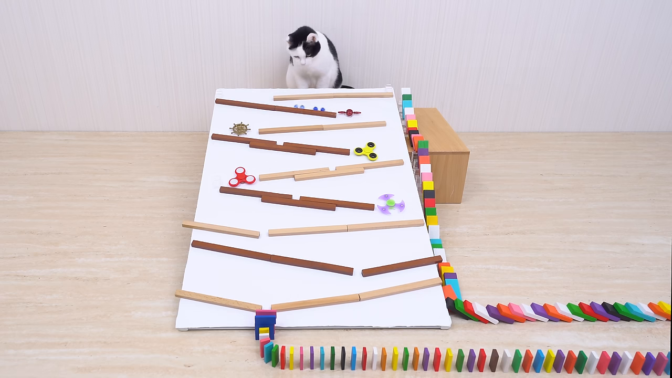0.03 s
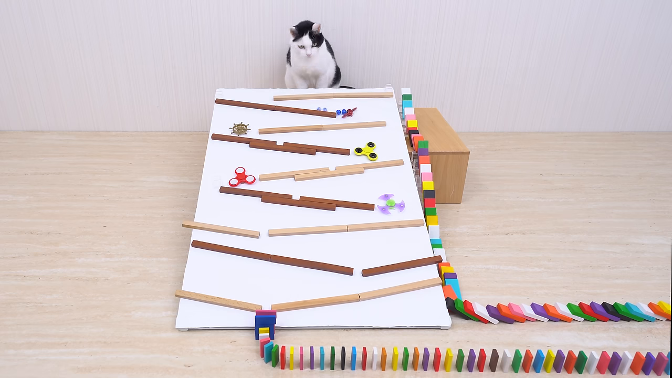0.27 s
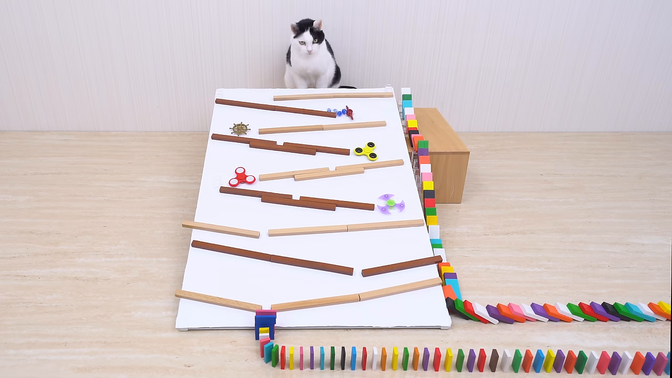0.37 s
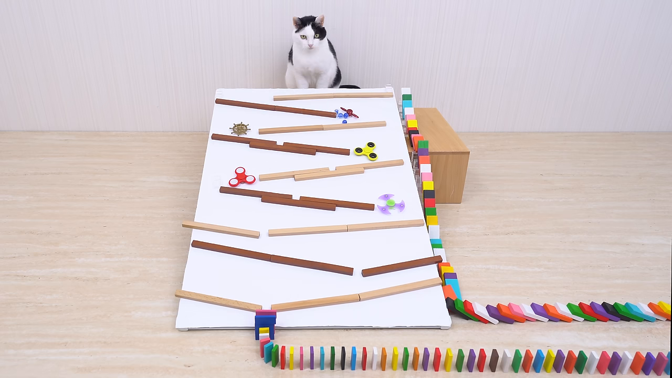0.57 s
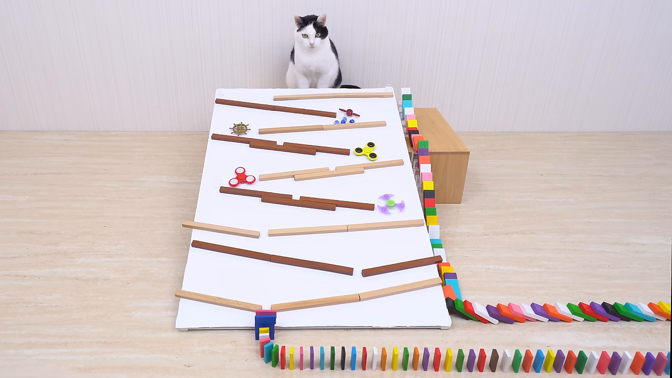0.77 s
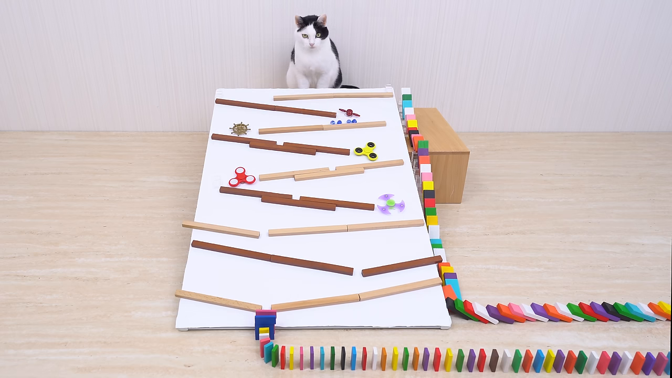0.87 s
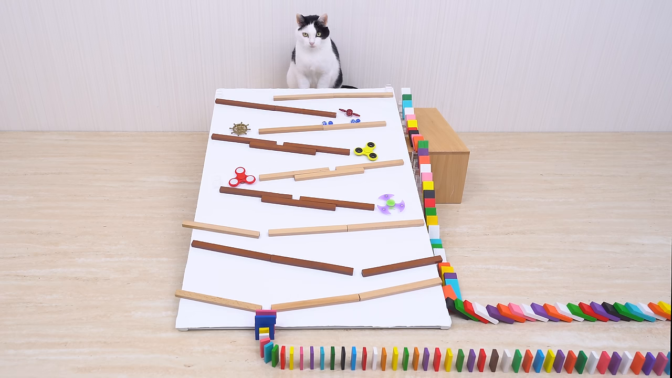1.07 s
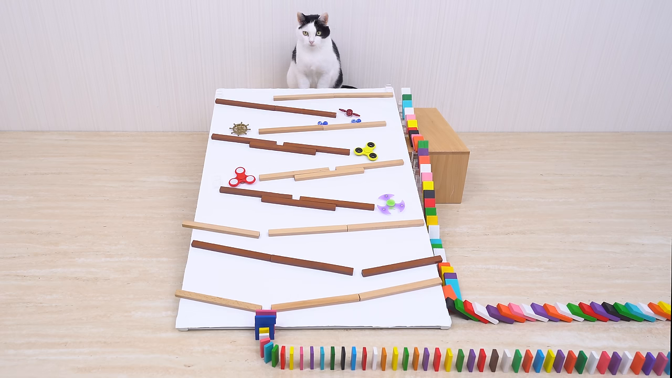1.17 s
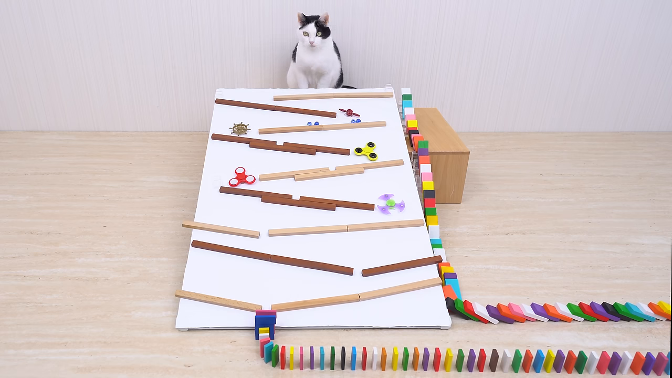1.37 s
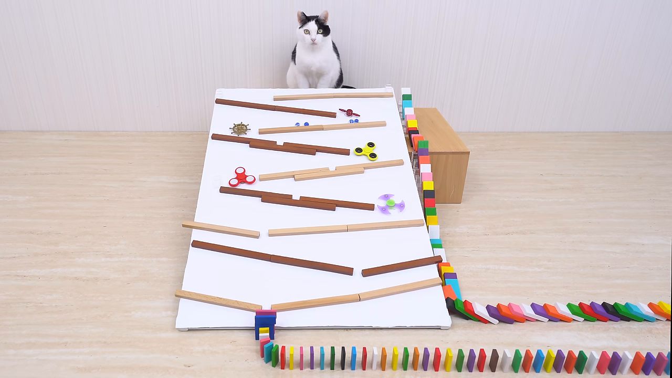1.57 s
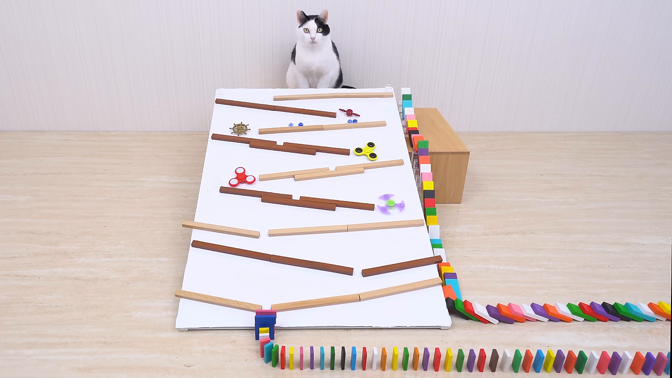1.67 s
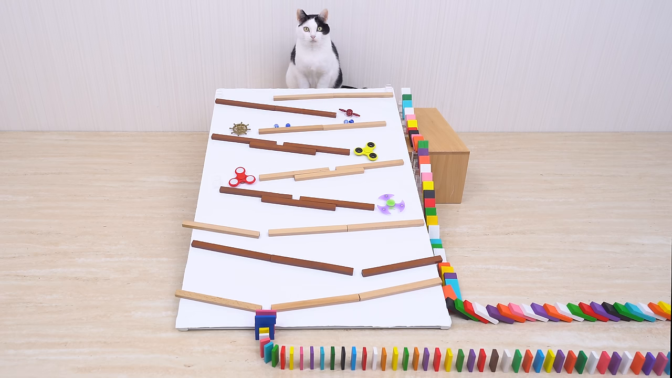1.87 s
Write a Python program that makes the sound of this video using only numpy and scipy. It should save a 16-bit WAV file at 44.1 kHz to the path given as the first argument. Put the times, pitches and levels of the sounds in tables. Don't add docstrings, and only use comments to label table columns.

```python
import sys
import numpy as np
from scipy import signal
from scipy.fft import rfft, irfft
from scipy.io import wavfile
from scipy.ndimage import uniform_filter1d

SR = 44100
rng = np.random.default_rng(int(sys.argv[2]) if len(sys.argv) > 2 else 0)


def boost(x):
    u = np.asarray(x, float) / 20
    return 10 ** u


def file_out(sig):
    cols = np.atleast_2d(sig).T
    lim = np.clip(cols, -1, 1)
    pcm = np.round(lim * 32767).astype(np.int16)
    wavfile.write(sys.argv[1], SR, pcm)


N = 83790


def read(points, hz):
    f, value = np.transpose(points)
    return np.interp(np.log(hz + 1), np.log(f + 1), value)


def evened(x):
    return x / np.sqrt(np.mean(x ** 2) + 1e-20)


def add(mix, start_s, sound):
    part = mix[max(round(start_s * SR), 0):][:len(sound)]
    part += sound[:len(part)]


def colour(x, points):
    hz = np.fft.rfftfreq(len(x), 1 / SR)
    return irfft(rfft(x) * boost(read(points, hz)), len(x))


def below(x, top_hz):
    hz = np.fft.rfftfreq(len(x), 1 / SR)
    return irfft(rfft(x) * np.clip((top_hz - hz) / 300, 0, 1), len(x))


def ring(modes, rise_s, detune=0.024, scatter_db=4):
    t = np.arange(SR // 4)[:, None] / SR
    hz, db, t60 = np.transpose(modes)
    level, pitch, sign = rng.standard_normal((3, len(hz)))
    decay = boost(db + scatter_db * level - 60 * t / t60)
    tones = decay * np.sin(2 * np.pi * hz * (1 + detune * pitch) * t) * np.sign(sign)
    x = tones.sum(1) * (1 - np.exp(-t[:, 0] / rise_s))
    return x / abs(x).max()


def bumps(per_s, modes, detune):
    spread_db = 4
    size = boost(spread_db * np.minimum(rng.exponential(1, N), 4))
    size = size * (rng.random(N) < per_s / SR) * rng.choice([-1, 1], N)
    spot = rng.integers(0, 4, N)
    out = np.zeros(N)
    for k in range(4):
        out += signal.oaconvolve(size * (spot == k), ring(modes, 0.000067, detune))[:N]
    return evened(out)


def click(points, t60, rough):
    size, spread_s = 2048, .0016
    t = np.arange(size) / SR
    log_gain = np.log(boost(read(points, abs(np.fft.fftfreq(size, 1 / SR)))))
    gain = np.exp(log_gain - 1j * signal.hilbert(log_gain).imag)[:1025]
    late_s = spread_s * np.interp(np.arange(1025), np.linspace(0, 1024, 16), rng.random(16) ** 2)
    shape = irfft(gain * np.exp(-2j * np.pi * np.cumsum(late_s) * SR / size))[:1024]
    chatter = rough * rng.standard_normal(size) * boost(-60 * t / t60)
    x = np.convolve((t == 0) + chatter, shape)[:1024]
    return x / abs(x).max()


def pushes(rows):
    t = np.arange(N) / SR
    return sum(boost(db) * np.sin(np.pi * np.clip((t - s) / length, 0, 1) ** 0.47) for s, length, db in rows)


def sliding(rows, points):
    snaps = rng.standard_normal(N) * (rng.random(N) < 4000 / SR)
    return pushes(rows) * evened(below(colour(snaps, points), 16000))


# pitch_hz, level_db (per Hz)
ROOM_TONE = [(12, -45), (20, 2), (146, -10.5), (574, -4), (678, -8.5), (1610, -22), (3530, -34.5),
             (9670, -36), (16000, -35)]


def room_tone():
    return boost(-71) * evened(below(colour(rng.standard_normal(N), ROOM_TONE), 12950))


# time_s, level_db
ROLL_LOAD = [(0, -55), (.22, -56.5), (.43, -56), (.5, -52), (0.581, -57), (.64, -52.5), (.68, -57.5),
             (.72, -65.5), (.77, -54.5), (.8, -59), (0.869, -54.5), (.915, -52), (.98, -51), (1.035, -62),
             (1.06, -72), (1.572, -73), (1.802, -70.5), (1.9, -65)]
# pitch_hz, level_db, t60_s
BOARD = [(283, -13.5, 0.015), (399.6, 3, 0.1), (426.5, -17, 0.96), (485, 7, 0.054), (508.3, -7.5, 0.14),
         (578, 3.5, 0.12), (759.6, 4, 0.055), (870, 2.5, 0.06), (980, -8, 0.089), (1228, -11, 0.092)]
# pitch_hz, level_db, t60_s
SLAT = [(1250, -11.5, 0.011), (1600, -2.5, 0.0024), (2144, -21, 0.031), (2850, 7.5, 0.0015),
        (4440, -13, 0.013)]


def rolling():
    load_db = np.interp(np.arange(N) / SR, *np.transpose(ROLL_LOAD))
    rumble = boost(load_db - 2) * bumps(1400, BOARD, 0.022)
    grit_db = -24.5 - 55.5 + 2.9 * (load_db + 59.0)
    grit = boost(grit_db) * below(bumps(9000, SLAT, 0.023), 4750)
    return rumble + grit


# start_s, length_s, level_db
HISSES = [
    (-.06, 0.095, -76),
    (.19, 0.077, -83),
    (1.25, .12, -82.5),
]
# pitch_hz, level_db
HISS = [(3000, -19.5), (5000, 0.5), (7500, -0.5), (9500, -6), (13000, -15.5)]


def faint_hisses():
    return sliding(HISSES, HISS)


KNOCK_T60_S, KNOCK_ROUGH = .005, .07
# start_s, body_db, click_db
LOW_KNOCKS = [
    (.069, -66.5, -75),
    (0.1184, -60, -57.5),
    (.13, -67.5, -58),
    (0.483, -39, -44),
    (1.1796, -50.5, -48.5),
    (1.3039, -47.5, -48.5),
]
# pitch_hz, level_db, t60_s
LOW_SLAT = [(418, -4.5, 0.099), (570, -1.5, 0.039), (890, -10, 0.036), (956, 1.5, 0.034),
            (1270, -7.5, 0.011), (1850, -13, 0.0066), (2500, -10.5, 0.0057), (3000, 0, 0.017),
            (3516, -15, 0.011), (4470, -3, .015)]
# pitch_hz, level_db
LOW_CLICK = [(300, -16.5), (900, -4.5), (2000, 6), (3400, -1.5), (4500, -5.5), (5000, -14.5), (6000, -13.5),
             (12000, -43)]


def low_knocks():
    out = np.zeros(N)
    for s, body_db, click_db in LOW_KNOCKS:
        add(out, s, boost(body_db) * ring(LOW_SLAT, .0003, detune=0.011, scatter_db=3.5))
        add(out, s, boost(click_db) * click(LOW_CLICK, KNOCK_T60_S, KNOCK_ROUGH))
    return out


# pitch_hz, level_db
TICK = [(880, -65), (1500, -38), (4130, -15), (5330, 2.5), (7910, 10.5), (15600, 5), (16900, -48.5)]


def glass_tick():
    return click(TICK, 0.0035, 0.16)


# pitch_hz, level_db
KNOCK = [(300, -26.5), (700, -1.5), (2170, -0.5), (3480, 3), (6260, -4.5), (7270, -33.5), (9000, -23.5),
         (11700, -44.5)]
# pitch_hz, t60_s, level_db
KNOCK_MODE = (3360, .014, -5)


def slat_knock():
    t = np.arange(1024) / SR
    hz, t60, mode_db = KNOCK_MODE
    mode = boost(mode_db - 60 * t / t60) * np.sin(2 * np.pi * hz * t)
    return mode + click(KNOCK, KNOCK_T60_S, KNOCK_ROUGH)


# pitch_hz, level_db, t60_s
THUMP = [(221, -9, 0.032), (258, -1.5, 0.027), (295.8, -1, 0.046), (341.3, -5.5, 0.035),
         (396.5, 1.5, 0.064), (440, 1, 0.06), (493, -2.5, 0.079), (511, -1.5, 0.047), (565.8, 5.5, 0.074),
         (680, -6.5, 0.05), (764, -9.5, 0.05), (870, -5, 0.054), (987, -12, 0.059), (1164, -14.5, 0.071)]


def board_thump():
    return ring(THUMP, 0.0067, detune=0.014, scatter_db=3.0)


# start_s, tick_db, slat_db, board_db
HITS = [(0.181, -65, -90, -63), (0.185, -86.5, -86.5, -54), (0.2408, -33, -61, -58),
        (0.286, -36.5, -81, -54.5), (0.304, -38, -89.5, -62), (0.3495, -30, -69.5, -52.5),
        (.362, -49, -58, -65), (.37, -48.5, -53.5, -59), (0.442, -23, -71.5, -56),
        (0.45, -26, -73.5, -52.5), (.46, -34.5, -71, -70), (0.4929, -23.5, -53, -50),
        (.561, -34.5, -58.5, -59.5), (0.578, -66.5, -53, -45), (0.5878, -28.5, -33.5, -42),
        (0.605, -52, -53, -50), (0.724, -22, -38.5, -39), (0.741, -50, -57.5, -47),
        (0.776, -29.5, -46, -54.5), (0.8101, -38, -38, -40.5), (.85, -24, -67.5, -62),
        (.854, -39.5, -35.5, -44), (0.925, -36, -36, -41), (.971, -63, -54.5, -52.5),
        (1.248, -66, -82, -70), (1.891, -84, -83, -53.5)]


def contacts():
    out = np.zeros(N)
    for s, tick_db, slat_db, board_db in HITS:
        add(out, s, boost(tick_db - 3) * glass_tick())
        add(out, s, boost(slat_db + 8.5) * slat_knock())
        add(out, s, boost(board_db + 4.5) * board_thump())
    return out


# start_s, low_mode_db, middle_modes_db, top_modes_db
STRIKES = [(0.2395, -47.5, -56, -42), (0.258, -43, -47, -67.5), (.282, -51, -51, -61),
           (.298, -49, -54, -72), (0.319, -48.5, -58.5, -63.5), (.328, -58.5, -45.5, -72.5),
           (0.349, -53, -47.5, -44), (0.362, -47.5, -53, -75), (0.391, -55.5, -60.5, -75),
           (0.41, -58.5, -49.5, -77), (0.459, -49, -52.5, -70), (0.477, -77, -39, -57.5),
           (.4938, -57.5, -28.5, -53.5), (0.541, -73.5, -58.5, -72.5), (.565, -72, -50, -76)]
STEEL_HZ = (4205, 4260, 7907, 8157, 8140, 15105, 15518)
# level_db, t60_s, flutter_db, rise_s
STEEL = [(-4, .1, 3, .002), (-1, .022, 1, .001), (0, .14, 1, .007), (-2, .13, 1, .007), (-17, .55, 3, .007),
         (0, .13, 2, .002), (-12, .7, 2.5, .002)]
STEEL_GROUP = (1, 1, 2, 2, 2, 3, 3)


def spinner():
    stop_s, stop_t60_s, phase_scatter = 0.59, 0.023, .15
    out, t = np.zeros(N), np.arange(SR // 2) / SR
    for hz, (db, t60, flutter_db, rise_s), group in zip(STEEL_HZ, STEEL, STEEL_GROUP):
        mode = np.zeros(N)
        for row, turn in zip(STRIKES, rng.random(len(STRIKES))):
            level = boost(row[group] + db - 60 * t / t60) * (1 - np.exp(-t / rise_s))
            cycles = hz * (t + row[0]) + phase_scatter * turn
            add(mode, row[0], level * np.sin(2 * np.pi * cycles))
        wobble = uniform_filter1d(rng.standard_normal(N), size=300)
        wobble = evened(uniform_filter1d(wobble, size=300))
        out += mode * boost(flutter_db * wobble)
    since_stop = np.maximum(np.arange(N) / SR - stop_s, 0)
    return out * boost(-60 * since_stop / stop_t60_s)


# start_s, length_s, level_db
SCUFFS = [
    (.24, 0.05, -57),
    (0.347, 0.097, -57),
    (.45, 0.026, -53),
    (0.484, 0.09, -53.5),
]
# pitch_hz, level_db
SCUFF = [(1500, -8.5), (3000, -5), (4300, 1), (5500, -1), (8000, -0.5), (12000, 2), (16000, -10.5)]


def scuffs():
    return sliding(SCUFFS, SCUFF)


# start_s, length_s, level_db
RATTLES = [
    (1.843, 2.1, -70),
]
# pitch_hz, level_db, t60_s
RATTLE = [(2100, -9, .005), (3100, -6, .005), (4300, 0, .012), (6150, -9, .01), (7900, -11, .005),
          (11700, -10, .015), (14100, -18, .01), (15500, -17, .012)]


def far_rattle():
    return pushes(RATTLES) * bumps(1200, RATTLE, .004)


# delay_s, level_db
ECHOES = [
    (.0028, -11.5),
    (0.0154, -7.5),
    (0.018, -16.5),
    (0.0235, -20.5),
]
# pitch_hz, level_db
ECHO_COLOUR = [(300, -2), (2000, 6.5), (3300, -6), (6000, -1), (9000, 0.5), (16000, -7)]
# pitch_hz, t60_s
ROOM_DECAY = [(200, .5), (500, 0.3448), (1500, 0.62), (3500, 0.4542), (8000, 0.47), (15000, 0.345)]
# pitch_hz, level_db
ROOM_COLOUR = [(300, -4), (700, -2.5), (1500, -3.5), (3000, -1), (3370, 0), (3750, -1), (6000, -3),
               (15000, -10)]


def room(x):
    tail_start_s, tail_rise_s, wet_db = 0.0025, 0.028, 1
    out, t = np.zeros(N), np.arange(N) / SR
    for s, db in ECHOES:
        add(out, s, boost(db) * colour(x, ECHO_COLOUR))
    for k in range(3):
        hz, frames, z = signal.stft(rng.standard_normal(SR), SR, nperseg=256)
        decay = boost(-60 * frames / read(ROOM_DECAY, hz)[:, None])
        tail = signal.istft(z * decay, SR, nperseg=256)[1][:SR]
        tail *= np.clip((t[:SR] - tail_start_s) / tail_rise_s, 0, 1)
        tail = colour(tail / np.linalg.norm(tail), ROOM_COLOUR)
        share = np.sqrt(2 / 3) * np.cos(np.pi * (3.7 * t + k / 3))
        out += boost(wet_db) * signal.fftconvolve(x * share, tail)[:N]
    return below(out, 16000)


def scene():
    hits = contacts() + low_knocks() + scuffs() + faint_hisses() + far_rattle()
    steel = spinner()
    roll = rolling()
    tone = room_tone()
    wet = room(hits + boost(-9) * steel)
    return (hits + steel + roll + wet + tone)[None]


# pitch_hz, level_db
MIC = [(25, -33.5), (50, -7), (120, -1.5), (220, 1), (16700, 0.5), (17100, -42)]


def microphone(x):
    return colour(x, MIC)


def low_pass(x):
    return signal.sosfilt(signal.butter(12, 17060, fs=SR, output="sos"), x)


def record(dry):
    mix = microphone(dry[0])[None]
    return low_pass(mix)


dry = scene()
out = record(dry)
file_out(out)
```